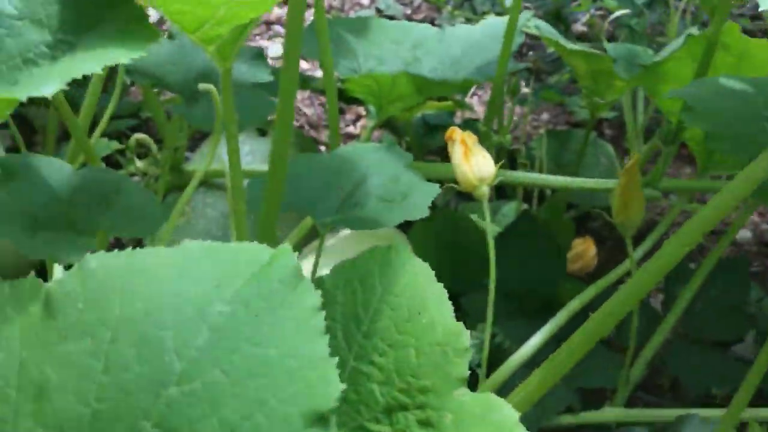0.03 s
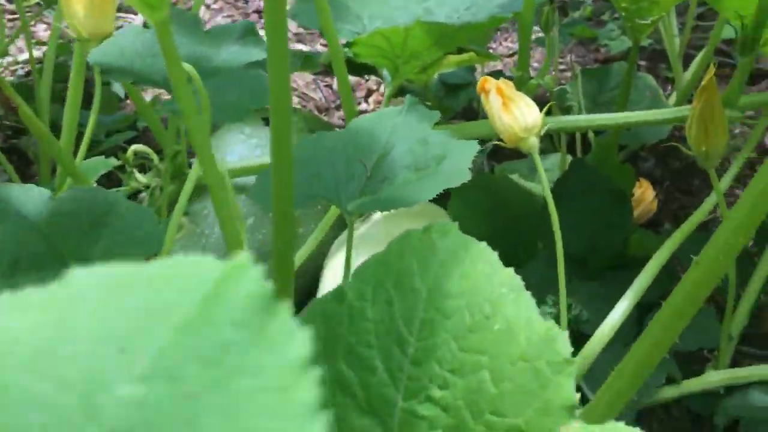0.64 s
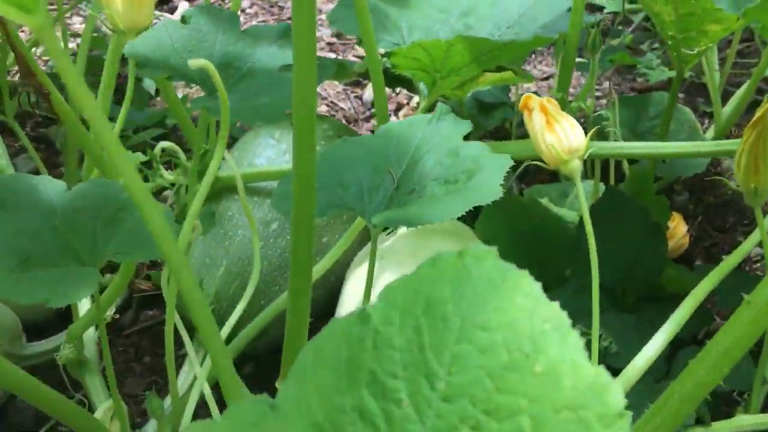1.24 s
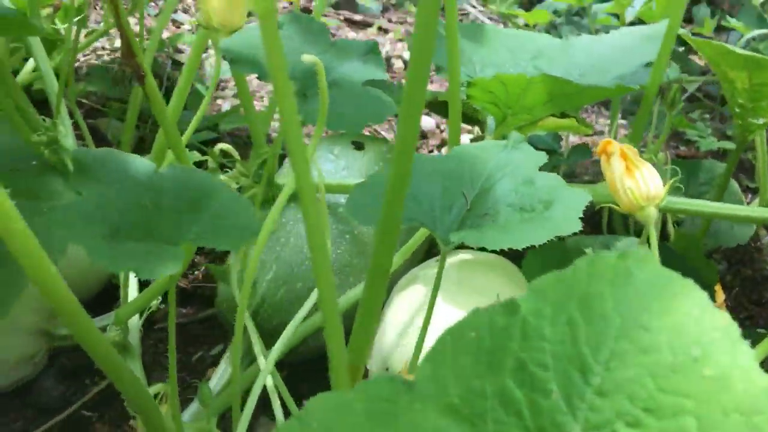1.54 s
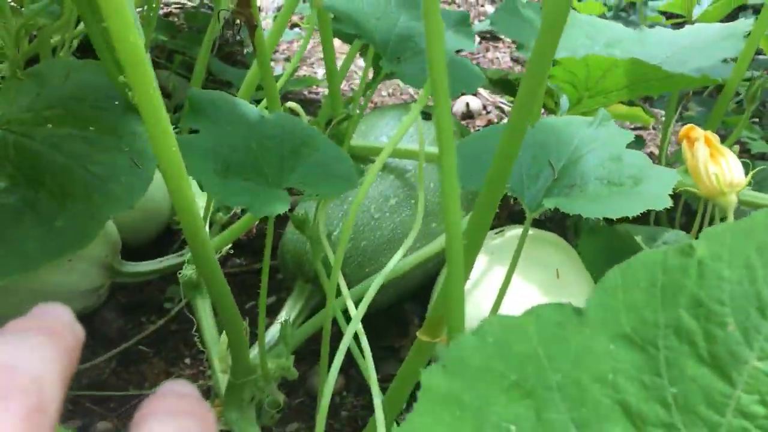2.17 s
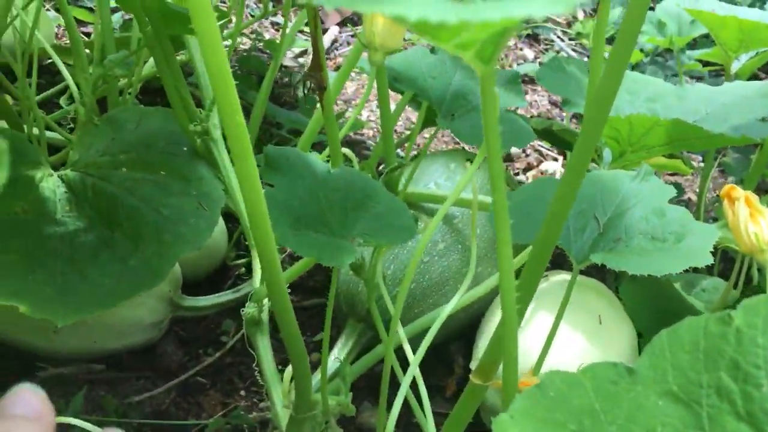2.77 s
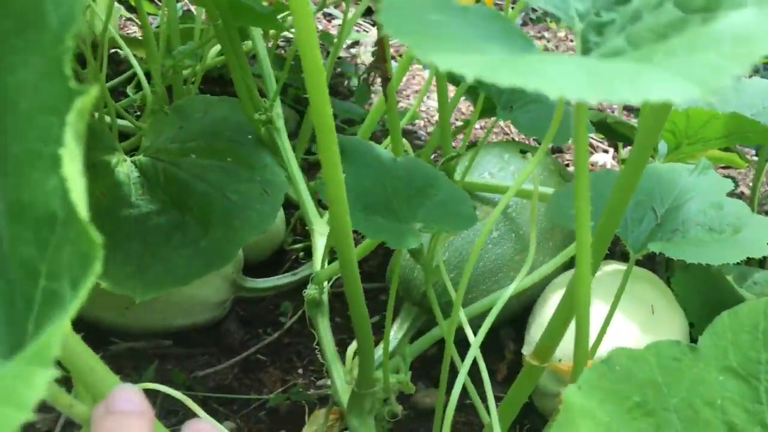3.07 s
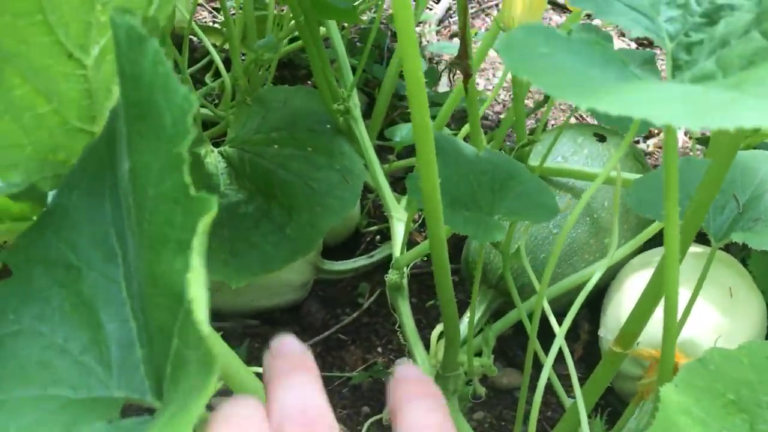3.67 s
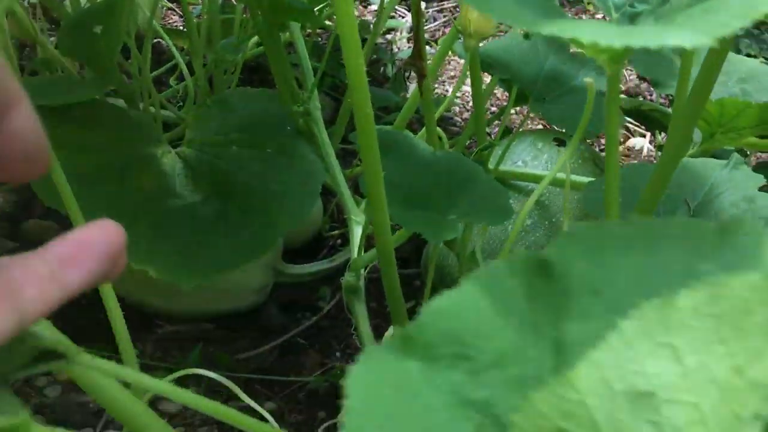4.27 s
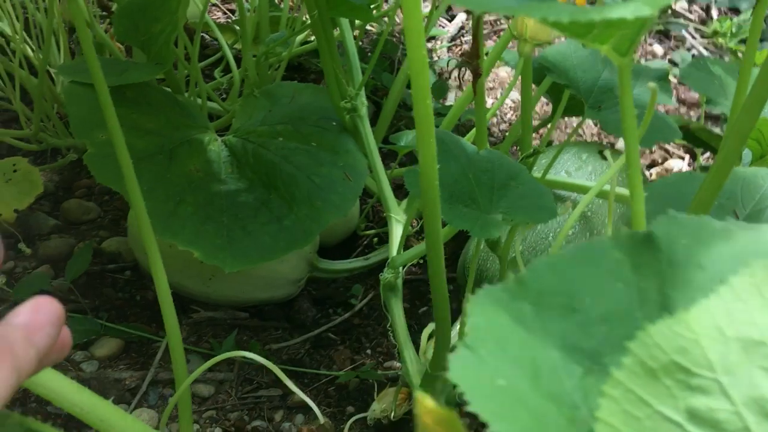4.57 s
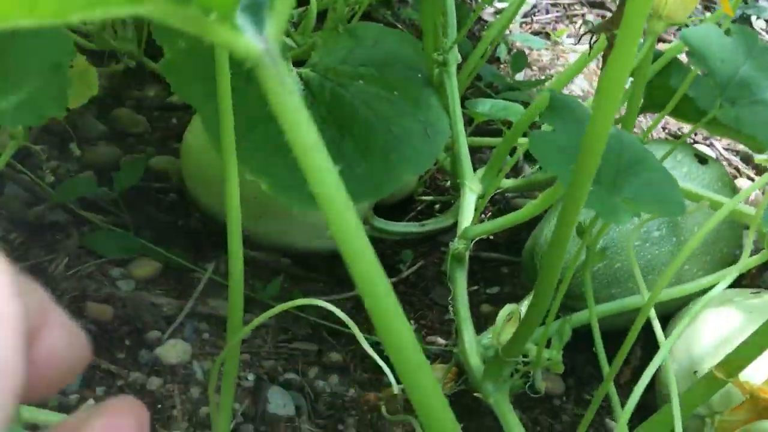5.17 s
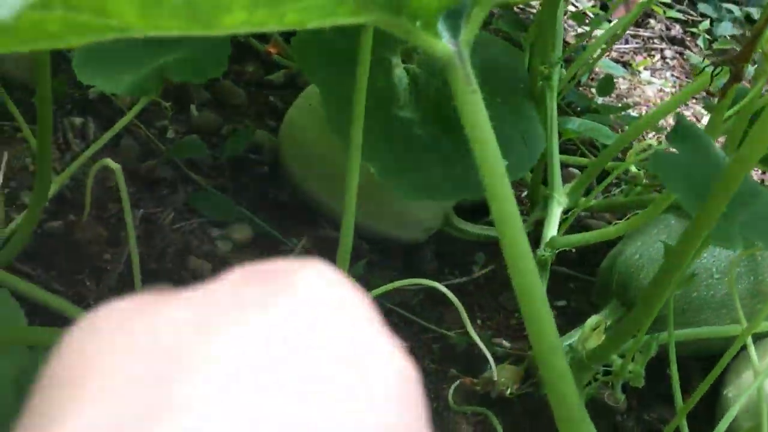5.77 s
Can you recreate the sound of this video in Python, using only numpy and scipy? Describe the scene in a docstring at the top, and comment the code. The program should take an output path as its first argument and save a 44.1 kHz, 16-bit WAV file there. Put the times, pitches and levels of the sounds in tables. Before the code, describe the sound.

A hand pushes through large, bristly leaves in a garden, close to the microphone. A brief hiss of a sliding leaf leads into uneven, papery rustling with small crackles. The microphone is bumped softly around one second in. After a gentler stretch, the rustling grows stronger from about four seconds, with sharper snaps of veins and stalks over a faint outdoor rumble.

```python
"""A hand pushes through bristly squash leaves in a garden, close to a handheld camera.
First a leaf edge slides off with a hiss. Then, stroke by stroke, stiff hairs catch and let go,
broad blades and hollow stalks ring with them, and veins snap. Around one second in, the camera is
bumped a few times. After a softer stretch, the hardest pushes and loudest snaps come from about four
seconds on, with a few more bumps. A faint outdoor rumble lies beneath from start to end."""
import sys
import numpy as np
from scipy import signal
from scipy.fft import rfft, irfft, next_fast_len
from scipy.io import wavfile
from scipy.ndimage import uniform_filter1d, map_coordinates

SR = 44100
rng = np.random.default_rng(int(sys.argv[2]) if len(sys.argv) > 2 else 0)


def transcribe(signal):
    """Save signal, clipped to [-1, 1], as a 16-bit WAV file at the path in sys.argv[1]."""
    frames = np.atleast_2d(signal).T
    limited = np.clip(frames, -1, 1)
    pcm = np.round(limited * 32767).astype(np.int16)
    wavfile.write(sys.argv[1], SR, pcm)


N = 256220
TIME = np.arange(N) / SR

# Strokes of the hand through the leaves (a blade is the flat part of a leaf):
# (time [s], length [s], hair level [dB], blade level [dB], swell from start to end [dB])
HAND_STROKES = [(0, 0.12, -47, -56, -1), (0.142, 0.049, -48.5, -52, -3.5), (.2, .15, -56.5, -59.5, 6),
                (0.382, 0.18, -43, -53, -3.5), (0.577, 0.098, -48, -55.5, -0.5), (.76, 0.089, -53, -54, -2),
                (0.836, .15, -47.5, -56.5, -5), (0.993, 0.15, -43.5, -57.5, -0.5),
                (1.149, 0.29, -47, -57, -6.5), (1.462, 0.065, -45.5, -54, 0),
                (1.536, .1, -51.5, -61.5, -2.5), (1.674, 0.35, -51.5, -60, -8), (2.187, .1, -59, -69, -10),
                (2.326, .06, -57, -62, -2), (2.426, 0.22, -52.5, -62, -2), (2.647, 0.46, -49.5, -58, -1.5),
                (3.132, 0.037, -47, -55, 1), (3.205, .06, -49, -56, -2.5), (3.313, 0.029, -51.5, -63, 1.5),
                (3.5, .03, -49.5, -62, -4), (3.655, 0.086, -47, -59.5, 10.5), (3.731, .15, -39.7, -50, 1),
                (3.889, 0.23, -44, -53, -1.5), (4.165, 0.23, -44.5, -52.5, 3.5),
                (4.382, 0.067, -37.5, -45, -3.5), (4.454, .08, -49.5, -59.5, -4),
                (4.547, 0.2, -47.5, -55.5, -7.5), (4.739, 0.1, -44.5, -47.5, -3),
                (4.814, 0.32, -42, -48.5, -0.5), (5.142, 0.071, -48, -49, 2.5), (5.236, 0.17, -57, -61, 6),
                (5.381, 0.081, -51, -53, -9), (5.498, 0.16, -47, -48.5, -5.5),
                (5.663, 0.16, -49, -53.5, 0.5)]
# Quick brushes of leaf over leaf: (time [s], length [s], hair level [dB], blade level [dB])
LEAF_BRUSHES = [(0.355, 0.029, -44.5, -52), (0.5, 0.02, -35.5, -46.5), (0.758, 0.043, -52.5, -53),
                (0.999, .018, -39, -55), (2.439, 0.029, -52, -53.5), (2.762, .03, -49.5, -56),
                (3.031, .013, -37.5, -48), (3.158, .016, -45, -54), (3.222, .012, -44.5, -55),
                (3.256, .012, -45, -55), (3.915, 0.0075, -38.5, -47), (4.072, 0.021, -38.5, -62),
                (4.163, 0.038, -42, -54), (4.763, .011, -48, -49), (5.33, 0.02, -52.5, -50),
                (5.379, 0.01, -41, -45), (5.416, 0.017, -43, -47), (5.501, .015, -51, -42),
                (5.582, 0.015, -43.5, -43)]
# The bright tone of the stiff hairs: (frequency [Hz], relative level [dB])
HAIR_TONE = [(1470, -37), (2500, -3), (2820, -0.5), (3410, -4), (4310, -3), (4950, -5), (5780, 1),
             (6480, 1.5), (7750, -3.5), (8620, 0.5), (10500, -2), (11700, 1.5), (16100, 0), (16800, -1.5),
             (17500, -3.5)]
# The lower, papery tone of the blades: (frequency [Hz], relative level [dB])
BLADE_TONE = [(120, -29), (200, 0), (340, -0.5), (450, -5), (650, -3.5), (1000, -2), (1600, -0.5),
              (2100, -1), (2900, -5.5), (3800, -5.5), (5200, -10.5), (9000, -28.5)]
# Veins and stalks snapping:
# (time [s], level [dB], ring pitch [Hz], relative level of the lows [dB], ring strength [ratio])
VEIN_SNAPS = [(.273, -39, 2800, -7, 0.32), (.762, -32, 2080, 5, 0.69), (.8675, -26, 11400, -23, .4),
              (1.418, -26.5, 5560, -11, 0.88), (1.4432, -24, 11100, -19, 0.43),
              (1.6442, -31.5, 11700, -12, .4), (1.895, -34, 12000, -30, .4), (2.045, -34, 6300, -24, 0.62),
              (2.086, -35, 11600, -29, .4), (2.134, -37.5, 11400, -34, 0.44),
              (2.191, -32.5, 6460, -18.5, 0.62), (2.2, -41, 2970, -10, 1), (2.425, -26, 11500, -32, 0.22),
              (2.928, -33.5, 1900, -7, .45), (3.2074, -32, 11600, -17, .3), (3.302, -34, 11200, -22, 0.33),
              (3.455, -40, 3480, -16, 0.73), (3.656, -37, 11200, -11, 0.55),
              (3.921, -24.5, 2300, -7.5, .25), (4.077, -20.5, 6600, -20, 2), (4.186, -22, 9900, -30, 1.1),
              (4.367, -23, 8700, -30, 1.7), (4.3868, -19.5, 2800, -15, 1.3), (4.694, -34.5, 1760, -5, .5),
              (4.747, -26, 1790, -12, .9), (4.778, -27, 1200, -9, .4), (4.895, -22, 11900, -40, .4),
              (5.2132, -33, 2770, -17, 0.69), (5.3798, -19, 8500, -24, 1.3), (5.4165, -28, 9060, -21, .5),
              (5.7946, -31, 1600, -6, .5)]
# Scraped stalks, ribs and cupped blades, whose note glides as the touching point moves:
# (time [s], length [s], first pitch [Hz], last pitch [Hz], level [dB])
STALK_SCRAPES = [(.01, 0.13, 3000, 3100, -54), (0.384, 0.18, 2410, 2420, -52),
                 (0.825, 0.046, 4200, 4370, -57), (0.804, 0.098, 1600, 2090, -60),
                 (.89, 0.096, 2150, 2580, -53), (0.99, 0.29, 2700, 2730, -59),
                 (0.991, .02, 5500, 5700, -47), (1.257, 0.047, 6750, 6800, -55),
                 (4.381, 0.038, 2750, 2680, -42), (4.37, 0.046, 1060, 1040, -51),
                 (4.56, .04, 3900, 3600, -57), (5.049, 0.059, 2760, 2740, -47),
                 (5.032, 0.074, 1690, 1700, -51)]
# A leaf edge hissing as it slides off: (time [s], centre frequency [Hz], level [dB])
EDGE_HISS = [(0, 11200, -39), (.06, 12300, -45), (.09, 15000, -41), (.11, 16500, -44), (.135, 17000, -83)]
# The hand's rumble through the camera body: (time [s], level [dB])
HANDLING_LEVELS = [(0.0, -61.5), (1.02, -57), (2.05, -63.5), (2.86, -61), (3.59, -64.5), (3.98, -60),
                   (4.92, -60), (5.37, -59), (5.55, -57), (5.81, -57)]
# The deep tone of that rumble: (frequency [Hz], relative level [dB])
HANDLING_TONE = [(15, -38), (30, -15), (45, -3.5), (65, 0.5), (100, -2.5), (170, -5.5), (300, -14),
                 (600, -24), (2000, -29)]
# Bumps on the camera: (time [s], level [dB], pitch [Hz], time to fade by 60 dB [s])
CAMERA_BUMPS = [(0.721, -29, 142, 0.042), (0.735, -38.5, 75, 0.13), (0.843, -38.5, 59.6, 0.062),
                (1.018, -41, 140, 0.039), (1.11, -48, 75.3, 0.22), (3.83, -47, 70, .25),
                (5.393, -38.5, 175, .04), (5.693, -37, 106, 0.052)]
# The tone of the outdoor air: (frequency [Hz], relative level [dB])
AIR_TONE = [(25, -30), (80, 14.5), (300, -6), (900, -1.5), (2000, -7.5), (8000, -4.5), (17000, -6)]

EASY_RUB_DB = -52  # hair level of an unhurried stroke


def rubbing(resting_db=(-61.5, -72.5), easing=0.046):
    """Volume curves for hairs and blades: resting leaves, strokes and brushes add their power."""
    power = amp(resting_db)[:, None] ** 2 * np.ones(N)  # leaves that still lean on the hand
    for start, length, hair_db, blade_db, swell_db in HAND_STROKES:
        ease = easing * length  # longer strokes start and end more gently
        stroke = contact(start, length, rise=.006 + ease, fall=.016 + ease, swell_db=swell_db)
        power += np.outer(amp([hair_db, blade_db]), stroke) ** 2
    for start, length, hair_db, blade_db in LEAF_BRUSHES:
        brush = contact(start, length, rise=.0015, fall=.0037)
        power += np.outer(amp([hair_db, blade_db]), brush) ** 2
    return np.sqrt(power)


def rustle(hair_gain, blade_gain, judder_db=1.4, flutter_db=0.9, easy_ticks_per_s=1500):
    """Faster rubbing frees more hairs, so ticks merge into a hiss. The blades add a papery body."""
    hair_gain = amp(-.36) * hair_gain
    blade_gain = amp(-.5 + flutter_db * wobble(60)) * blade_gain
    speed = hair_gain / amp(EASY_RUB_DB)
    # Slow rubbing sticks and slips; fast rubbing glides.
    judder = amp(judder_db * (wobble(60) + wobble(160)) / speed ** .4)
    rate = easy_ticks_per_s * speed ** 1.3
    hairs = coloured(hair_ticks(rate, fade_s=.014, wander_db=4, ring=2.04), HAIR_TONE)
    blades = coloured(hair_ticks(.7 * rate, fade_s=.009, wander_db=4.5, ring=1.45), BLADE_TONE)
    hairs = flexing(hairs, depth_db=1.76)
    blades = flexing(blades, depth_db=1.32)
    return judder * (hair_gain * hairs + blade_gain * blades)


def hair_ticks(rate, fade_s, wander_db, ring, patches=10):
    """Hairs let go about `rate` times a second; each patch of leaf rings in its own way."""
    t = np.arange(SR // 50) / SR
    rings = rng.standard_normal((patches, len(t))) * amp(-60 * t / fade_s)
    rings *= ring / np.linalg.norm(rings, axis=1, keepdims=True)
    rings[:, 0] += 1  # the click that starts each ring
    tones = rfft(np.pad(rings, ((0, 0), (32, 32))))
    rings = irfft(tones / np.sqrt(np.mean(np.abs(tones) ** 2, axis=0)))  # together they favour no pitch
    shares = amp(wander_db * np.array([wobble(14) for _ in range(patches)]))  # the touch wanders
    chance = np.clip(rate / SR * shares ** 2 / np.sum(shares ** 2, axis=0), 0, 1)
    size_db = 4.5 * np.clip(rng.standard_normal((patches, N)), -2, 2)
    sizes = amp(size_db) * rng.choice([-1, 1], (patches, N))
    slips = (rng.random((patches, N)) < chance) * sizes / np.sqrt(chance.sum(axis=0))
    return unit(signal.oaconvolve(slips, rings, axes=1).sum(axis=0)[:N])


def flexing(sound, depth_db):
    """As the blades bend, they keep favouring different pitches."""
    spectrum = signal.stft(sound, nperseg=512)[2]
    ripple = uniform_filter1d(rng.standard_normal(spectrum.shape), size=11, axis=0)  # smooth over pitch
    ripple = uniform_filter1d(ripple, size=14, axis=1)  # and over time
    return unit(signal.istft(spectrum * amp(depth_db * unit(ripple)), nperseg=512)[1][:N])


def snaps(rows, crack_fade_s=0.0046, shiver_db=-25, shiver_fade_s=0.074, ring_cycles=18, boost_db=1):
    """A vein gives way: a crack, a brief note from the stalk, then the leaf shivers."""
    out = np.zeros(N)
    t = np.arange(SR // 20) / SR
    fade = amp(-60 * t / crack_fade_s) + amp(shiver_db - 60 * t / shiver_fade_s)
    for start, db, ring_hz, low_db, ring in rows:
        fibres = rng.choice([-1, 1], len(t)) * fade
        lows = [(200, low_db + 1), (1000, low_db + 11), (3000, low_db + 17)]
        crack = coloured(fibres, lows + [(6000, 1.5), (17000, 4.0), (18500, -17)])
        phase = 2 * np.pi * ring_hz * t
        build_up = 1 - np.exp(-phase / np.pi)  # takes about one cycle
        note = np.sin(phase) * build_up * amp(-60 * t * ring_hz / ring_cycles)
        snap = crack / np.abs(crack).max() + ring * note
        add(out, start, amp(db + boost_db) * snap / np.abs(snap).max())
    return out


def crackles(hair_gain, per_s=36, spread_db=5.5, low_hz=2500, high_hz=11900, low_db=-19.5, ring=0.46):
    """Small veins snap at random all the while; harder rubbing makes them louder."""
    rows = []
    for when, size, pitch in rng.random((round(per_s * N / SR), 3)):
        effort_db = 20 * np.log10(hair_gain[int(when * N)]) - EASY_RUB_DB
        db = -39.5 + .86 * effort_db + spread_db * (2 * size - 1)
        ring_hz = low_hz * (high_hz / low_hz) ** pitch
        rows.append((when * N / SR, db, ring_hz, low_db, ring))
    return snaps(rows)


def scrapes(rasp_db=2.5):
    """Many tiny, uneven slips make a leaf edge hiss and the stalks sound their notes."""
    slips = hair_ticks(12000, fade_s=.004, wander_db=4, ring=.35)
    slips *= amp(rasp_db * (wobble(35) + wobble(120)))
    edge_hz, edge_db = curves(EDGE_HISS)
    out = amp(edge_db) * resonate(slips, edge_hz, octaves=.4, steepness=6)
    for start, length, first_hz, last_hz, db in STALK_SCRAPES:
        glide_hz = np.interp(TIME, [start, start + length], [first_hz, last_hz])
        note = resonate(slips, glide_hz, octaves=.27, steepness=2.2)
        out += amp(db) * contact(start, length, rise=.0075, fall=.014) * note
    return out


def leaf_echoes(sound, echo_db=-13, fade_s=0.026, count=8):
    """Nearby leaves and soil add short echoes to the sound, which shift as the leaves move."""
    t = np.arange(SR // 10) / SR
    tails = rng.standard_normal((count, len(t))) * amp(-60 * t / fade_s) * (t > .001)
    tails /= np.linalg.norm(tails, axis=1, keepdims=True)
    paths = np.array([wobble(7) for _ in range(count)])
    paths /= np.linalg.norm(paths, axis=0)
    echoes = signal.oaconvolve(sound * paths, tails, axes=1).sum(axis=0)[:N]
    return sound + amp(echo_db) * echoes


def camera_handling(hair_gain, boost_db=1, uneven_db=2, thud_db=-13):
    """The hand rumbles through the camera, more as it pushes; bumps add a thud and a short low note."""
    level_db, = curves(HANDLING_LEVELS)
    effort = hair_gain / amp(EASY_RUB_DB)
    rumble_gain = amp(level_db + boost_db + uneven_db * wobble(25)) * effort ** .13
    notes = np.zeros(N)
    t = np.arange(SR // 5) / SR
    for start, db, hz, fade_s in CAMERA_BUMPS:
        push = 2 * amp(db - 60 * t / fade_s) * (1 - np.exp(-t / .0054))
        add(notes, start, push * np.sin(2 * np.pi * hz * t))
        add(rumble_gain, start, amp(thud_db) * push)  # the thud is a brief swell of the rumble
    return notes + rumble_gain * coloured(rng.standard_normal(N), HANDLING_TONE)


def garden_air(level_db=-62.5):
    """The still outdoor air: a faint, steady rumble with a little hiss."""
    return amp(level_db) * coloured(rng.standard_normal(N), AIR_TONE)


def contact(start, length, rise, fall, swell_db=0):
    """Volume curve of one touch: it catches, swells or fades, then slides free. Times are in seconds."""
    gain = np.zeros(N)
    t = np.arange(round((length + 10 * fall) * SR)) / SR
    catch = 1 - np.exp(-t / rise)
    hold = amp(swell_db * (np.minimum(t / length, 1) - .5))
    release = np.exp(-np.maximum(t - length, 0) / fall)
    add(gain, start, catch * hold * release)
    return gain


def resonate(slips, centre_hz, octaves, steepness):
    """Keep the sound near one moving pitch; `octaves` sets how near."""
    hz, t, spectrum = signal.stft(slips, SR, nperseg=512)
    distance = np.log2((hz[:, None] + 1) / np.interp(t, TIME, centre_hz)) / octaves
    gain = 1 / (1 + np.abs(distance) ** steepness)
    gain /= np.sqrt(np.mean(gain ** 2, axis=0))
    return unit(signal.istft(spectrum * gain, SR, nperseg=512)[1][:N])


def coloured(sound, tone):
    """Give a sound a tone, drawn as points of (frequency [Hz], relative level [dB])."""
    size = 2 * next_fast_len(len(sound) // 2 + 4096)
    tone_hz, tone_db = np.transpose(tone)
    hz = np.fft.rfftfreq(size, 1 / SR)
    gain = unit(amp(np.interp(np.log(hz + 1), np.log(tone_hz), tone_db)))
    # These steps make the filter ring only after a click, never before it.
    cepstrum = irfft(np.log(gain + 1e-6))
    cepstrum[1:size // 2] *= 2
    cepstrum[size // 2 + 1:] = 0
    return irfft(rfft(sound, size) * np.exp(rfft(cepstrum)))[:len(sound)]


def wobble(rate):
    """A smooth curve through `rate` random values a second."""
    return map_coordinates(rng.standard_normal(int(N * rate / SR) + 4), [TIME * rate])


def curves(rows):
    """Join a table's rows with straight lines: one curve for each column after the time."""
    times, *columns = np.transpose(rows)
    return [np.interp(TIME, times, column) for column in columns]


def add(track, start, sound):
    """Mix a sound into the track at `start` seconds."""
    first = max(round(start * SR), 0)
    track[first:first + len(sound)] += sound[:max(N - first, 0)]


def amp(db):
    """Turn decibels into a number to multiply by."""
    return 10 ** (np.asarray(db) / 20)


def unit(x):
    """Scale x so that its typical size (root mean square) is 1."""
    return x / np.sqrt(np.mean(x ** 2) + 1e-20)


def scene():
    """Mix the leaves, the camera handling and the garden air into one channel."""
    hair_gain, blade_gain = rubbing()
    leaves = rustle(hair_gain, blade_gain) + scrapes() + snaps(VEIN_SNAPS) + crackles(hair_gain)
    air = garden_air()
    return (leaf_echoes(leaves) + camera_handling(hair_gain) + air)[None]


def record(dry):
    """The camera cuts off the very highest frequencies."""
    top_hz = 17300
    size = next_fast_len(N + SR // 4)
    hz = np.fft.rfftfreq(size, 1 / SR)
    return irfft(rfft(dry, size) / (1 + (hz / top_hz) ** 200), size)[:, :N]


dry = scene()
out = record(dry)
transcribe(out)
```